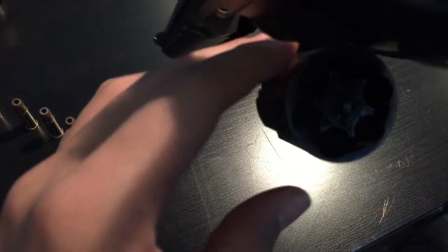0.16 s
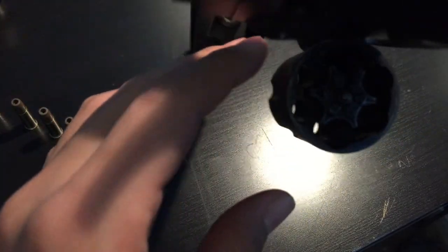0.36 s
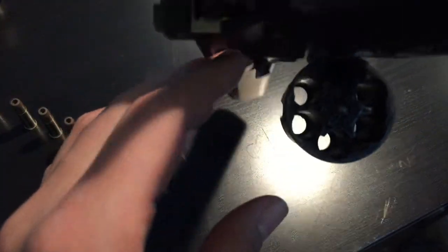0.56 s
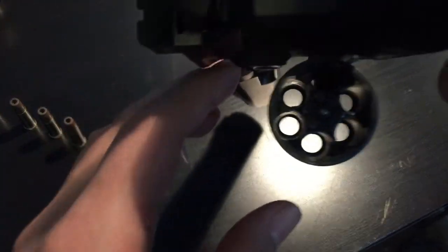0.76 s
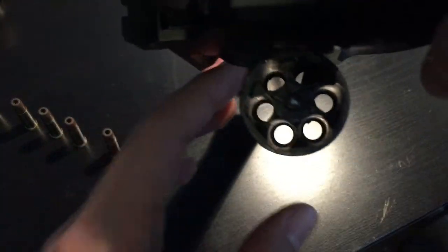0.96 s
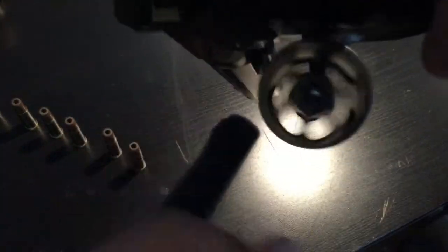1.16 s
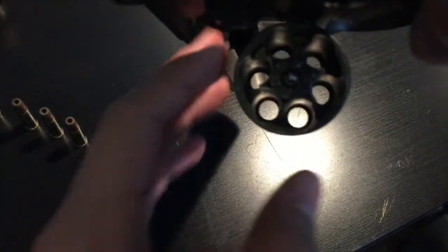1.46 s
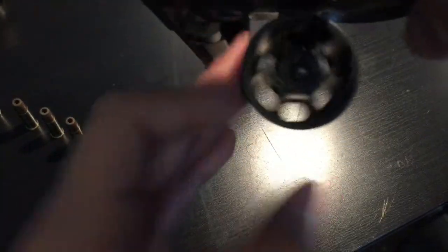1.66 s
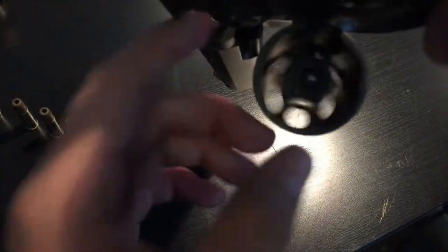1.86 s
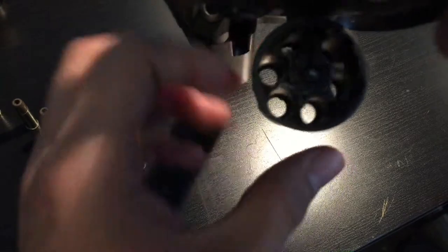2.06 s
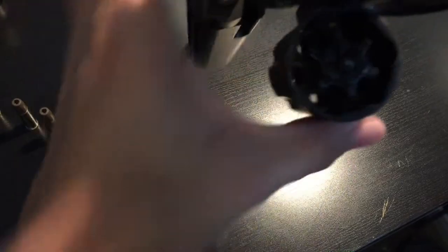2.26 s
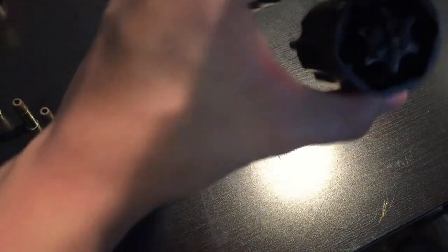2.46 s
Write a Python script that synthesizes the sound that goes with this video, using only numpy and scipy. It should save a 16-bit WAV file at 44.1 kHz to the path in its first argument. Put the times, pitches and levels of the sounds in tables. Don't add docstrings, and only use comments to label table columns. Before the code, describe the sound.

A toy revolver clicks close to a phone microphone: faint ticks and a soft flick, a hard latch snap, a duller finger catch, light ticks, then a loud metallic snap shut in a small room.

```python
import sys
import numpy as np
from scipy import signal
from scipy.io import wavfile
from scipy.ndimage import uniform_filter1d

SR = 44100
rng = np.random.default_rng(int(sys.argv[2]) if len(sys.argv) > 2 else 0)


def elevation(decibels):
    levels = np.asarray(decibels, float)
    return 10 ** (levels / 20)


def wav_record(signal):
    frames = np.transpose(np.atleast_2d(signal))
    bounded = np.clip(frames, -1, 1)
    quanta = np.round(bounded * 32767).astype(np.int16)
    wavfile.write(sys.argv[1], SR, quanta)


N = 114660

# pitch_hz, level_db (per Hz)
HISS_SPECTRUM = [(25, -25.5), (60, -5), (130, -5.5), (300, -11), (600, -15.5), (2000, -20), (8000, -28),
                 (15000, -28.5)]
# pitch_hz, width_hz, level_db (rms)
FAN_BANDS = [(61.24, 20, -73.5), (131, 19, -77), (293.7, 60, -77), (942, 22, -85)]
# pitch_hz, level_db, t60_s
ROOM_BANDS = [(300, -35, 0.3), (700, -36, 0.3), (1400, -30, 0.3), (2800, -18.5, 0.19), (5000, -23, 0.27),
              (8000, -25, 0.33), (11000, -30.5, .25)]
# start_s, level_db
ROOM_SEND = [
    (0, -6),
    (1.0, 2),
    (1.5, 1),
    (1.9, -7),
    (2.5, 1),
]
# start_s, level_db (peak), pitch_hz, t60_s
TABLE_THUMPS = [(.470, -59, 66, 0.25), (.8425, -42.5, 251, 0.044), (.8434, -28, 620, 0.022),
                (.855, -48, 330, .03), (.845, -45.5, 91, 0.075), (1.1481, -36, 400, 0.049),
                (1.147, -30, 280, 0.029), (1.149, -32, 150, .07), (1.158, -32.5, 65, 0.11),
                (1.646, -43.5, 236, .04), (1.654, -37.5, 112.6, 0.045), (1.659, -50.5, 55, .2),
                (2.007, -47.5, 160, 0.048), (2.071, -64, 62, 0.34), (2.390, -60.5, 62, 0.39),
                (2.584, -45, 140, 0.11), (2.586, -48, 380, 0.05)]
# start_s, level_db (peak), pitch_hz (final), t60_s
FINGER_SKIDS = [
    (.858, -49, 800, .14),
    (.864, -63, 1450, .06),
]
# pitch_hz, level_db, t60_s
FRAME_MODES = [(781, 8, .03), (1050, 0, .05), (1420, 3, 0.04), (2000, -0.5, 0.021), (2700, 5, 0.033),
               (2990, -3, .03), (4423, -5.5, 0.047), (5720, -3.5, 0.0088), (6650, -4.5, 0.06),
               (7906, -7, 0.06), (9240, 3.5, 0.025), (12000, -2, 0.054), (12790, -16.5, 0.035),
               (13720, -9.5, 0.035)]
# pitch_hz, level_db, t60_s
CYLINDER_MODES = [(11788, 0, .065), (11835, -11, .12), (11765, -18, .22), (14880, -30, .24),
                  (14770, -33, .26), (14990, -31, .13)]
# pitch_hz, level_db, t60_s
BARREL_MODES = [(780, -33, .3), (935, -33, .42), (990, -29, .4), (1050, -30, .36), (1375, -34, .42),
                (1425, -34, .4)]
# start_s, level_db (peak), pitch_hz (centre), t60_s
LOOSE_TICKS = [(.7540, -49, 1850, 0.018), (0.7541, -48, 2960, 0.019), (.7545, -49.5, 7240, 0.019),
               (1.845, -56, 2540, 0.018), (1.86, -54, 890, 0.042), (1.888, -60, 1400, 0.018),
               (1.917, -59, 2500, 0.011), (2.139, -47, 2510, 0.019), (2.1394, -53, 1280, .016),
               (2.274, -41.5, 1505, 0.022), (2.2745, -43, 2610, 0.013), (2.2748, -46, 4860, 0.0098),
               (2.327, -51.5, 2570, 0.017), (2.3272, -57, 1330, 0.021), (2.4, -67.5, 12000, .04),
               (2.2746, -54, 6600, .015), (2.2747, -56, 12500, .012), (1.858, -60, 1600, .04)]
# start_s, level_db (peak), pitch_hz (centre), t60_s, ring_db
FINGER_CONTACTS = [(.833, -58, 1700, 0.092, -36), (.8436, -36, 660, 0.02, -36),
                   (.843, -56, 5200, 0.009, -48), (.8436, -37, 1270, .026, -48),
                   (.8415, -47, 1900, 0.018, -52), (.843, -54, 2700, .014, -52),
                   (.856, -51.5, 625, 0.08, -48), (1.613, -56, 913, 0.15, -46),
                   (1.6436, -21.5, 4540, .014, -45), (1.6445, -28, 2200, 0.035, -37),
                   (1.6485, -27, 1900, 0.012, -35), (1.6505, -41, 7800, 0.015, -17),
                   (1.649, -26, 1150, 0.022, -40), (1.6545, -31, 930, .014, -40),
                   (1.651, -33, 2900, .02, -40), (1.648, -33, 4400, .02, -40),
                   (1.662, -53, 3460, 0.083, -40), (1.672, -44, 2200, 0.06, -38),
                   (1.68, -54, 3900, 0.15, -37), (1.7015, -51, 2430, .025, -40), (1.72, -60, 2400, .2, -40),
                   (1.735, -58.5, 14500, 0.057, -8), (1.81, -61, 13000, 0.045, -21),
                   (1.9978, -39.5, 4550, 0.02, -52), (1.9982, -32, 2500, 0.015, -47),
                   (2.0075, -48, 5800, 0.0046, -42.5), (2.0084, -32, 1220, 0.022, -53),
                   (2.0126, -38, 2300, 0.015, -47), (2.018, -52, 1800, .12, -50),
                   (2.0, -40, 1100, 0.025, -40)]
# start_s, level_db (peak), pitch_hz (centre), t60_s, ring_db
LATCH_SNAPS = [(1.1476, -7.5, 4800, .012, -25.5), (1.1486, -13, 1418, .03, -29),
               (1.1503, -19, 1045, 0.022, -26), (1.1513, -14.5, 6392, .015, -3),
               (1.153, -20, 2750, .015, -11.5), (1.1678, -22, 1300, .02, -27),
               (1.1701, -13, 7500, .004, -16), (1.1715, -24, 7000, .012, -31),
               (1.1735, -25, 2700, .015, -31), (1.177, -30, 1300, .02, -30),
               (1.184, -33, 1400, .015, -28.5), (1.189, -39, 1301, .012, -25.5),
               (2.5608, -56, 5700, .01, -15), (2.5635, -52, 2590, 0.03, -5.5),
               (2.578, -45, 3000, 0.04, -30), (2.5775, -48, 900, .015, -30), (2.5834, -6, 5600, 0.027, -21),
               (2.5852, -8, 8000, 0.014, -19), (2.5838, -8, 13700, 0.024, -22),
               (2.5857, -10, 2830, 0.0115, -18), (2.5864, -2, 2330, 0.011, -22.5),
               (2.5882, -13, 5600, 0.03, 6.5), (2.5892, -14, 1000, 0.045, -23),
               (2.5925, -19, 1270, 0.03, -8), (2.591, -19, 7700, .03, -12), (2.597, -25, 2600, .03, -20)]


def band(x, hz, width_hz):
    hz = min(hz, .45 * SR)
    b, a = signal.iirpeak(hz, hz / min(width_hz, .35 * SR), fs=SR)
    return signal.lfilter(b, a, x)


def wide_band(x, hz, first_hz, second_hz):
    return band(band(x, hz, first_hz), hz, second_hz)


def low_cut(x, order, hz):
    return signal.sosfilt(signal.butter(order, hz, "high", fs=SR, output="sos"), x)


def unit(x):
    return x / np.sqrt(np.mean(x ** 2))


def peak(x):
    return x / np.abs(x).max()


def fade(t, t60):
    return np.exp(-np.log(1000) * t / max(t60, .002))


def walk(rate_hz):
    hold = int(SR / rate_hz)
    steps = np.repeat(rng.standard_normal(N // hold + 1), hold)
    return 1.6 * uniform_filter1d(uniform_filter1d(steps, hold), hold)[:N]


def add(out, start_s, x):
    i = int(start_s * SR)
    out[i:i + len(x)] += x[:N - i]


def hiss():
    out = np.zeros(N)
    hz_points, db_points = np.array(HISS_SPECTRUM).T
    for hz in 30 * 2 ** np.arange(0, 9.1, .5):
        per_hz_db = np.interp(np.log(hz), np.log(hz_points), db_points)
        level_db = per_hz_db + 10 * np.log10(hz) + .6 * walk(6.5)
        out += elevation(level_db) * unit(wide_band(rng.standard_normal(N), hz, hz / 2, hz / 2))
    return elevation(-68.5) * unit(out)


def fan():
    swell = elevation(3.0 * walk(3.1))
    rumble, *upper = [elevation(db) * unit(band(rng.standard_normal(N), hz, width_hz)) for hz, width_hz, db in FAN_BANDS]
    motor_level = elevation(-72 + 2.2 * walk(14))
    motor_hz = 293.7 + 2.5 * walk(9.88)
    motor = motor_level * np.sin(2 * np.pi * np.cumsum(motor_hz) / SR)
    return swell * rumble + sum(upper) + motor


def room(x):
    rise_s, top_hz = 0.0092, 12000
    t = np.arange(SR // 2) / SR
    tail = np.zeros(len(t))
    for hz, db, t60 in ROOM_BANDS:
        noise = wide_band(rng.standard_normal(len(t)), hz, 0.93 * hz, 1.5 * hz)
        tail += elevation(db) * fade(t, t60) * unit(noise)
    tail = signal.sosfilt(signal.butter(8, top_hz, fs=SR, output="sos"), tail)
    build_up = (t / rise_s).clip(0, 1) ** 2
    return signal.fftconvolve(x, tail * build_up * elevation(-26.0))[:N]


def room_send():
    starts, level_db = np.array(ROOM_SEND).T
    current = np.searchsorted(starts, np.arange(N) / SR, side="right") - 1
    return elevation(level_db[current])


def gliding_tones(table, sag):
    rise_s = 0.0014
    out, t = np.zeros(N), np.arange(SR // 3) / SR
    for start_s, db, hz, t60 in table:
        phase = 2 * np.pi * np.cumsum(hz * (1 + sag * fade(t, t60))) / SR
        onset = 1 - np.exp(-t * hz / 100 / rise_s)
        add(out, start_s, elevation(db) * fade(t, t60) * onset * np.sin(phase))
    return out


def table_thumps():
    return gliding_tones(TABLE_THUMPS, .3)


def finger_skids():
    return gliding_tones(FINGER_SKIDS, -.3)


def modes(t, table, gains_db, phases):
    out = np.zeros(len(t))
    for (hz, db, t60), gain_db, phase in zip(table, gains_db, phases):
        out += elevation(db + gain_db) * fade(t, t60) * np.sin(2 * np.pi * (hz * t + phase))
    return out


def nearness_db(table, hz):
    reach_oct = 0.47
    return np.array([-6.0 * min((np.log2(mode[0] / hz) / reach_oct) ** 2, 5.0) for mode in table])


def crack(t, burst, shape, hz, t60, width):
    coloured = elevation(-2.5) * peak(wide_band(burst, hz, width * hz, 2 * width * hz))
    knock = elevation(-3) * shape * fade(t, t60) * np.sin(2 * np.pi * hz * t)
    tick = elevation(-21) * min(hz / 4000, 1) * burst * fade(t, t60)
    return coloured + knock + tick


def frame(t, hz, t60, chance):
    held = [(f * (1 + .02 * shift), db, d60) for (f, db, d60), shift in zip(FRAME_MODES, chance[40:])]
    gains_db = -11 + nearness_db(FRAME_MODES, hz) + 2.7 * chance[:14]
    return modes(t, held, gains_db, np.zeros(14)) * fade(t, 3.0 * t60)


def metal(t, hz, ring_db, barrel_db, chance):
    cylinder = modes(t, CYLINDER_MODES, ring_db + 2 * chance[14:20], chance[20:])
    barrel = modes(t, BARREL_MODES, barrel_db + nearness_db(BARREL_MODES, hz), chance[30:])
    return (1 - np.exp(-t / .0002)) * (cylinder + barrel)


def contacts(table, barrel_db, width):
    direct, scattered = np.zeros(N), np.zeros(N)
    t = np.arange(SR // 2) / SR
    short = t[:4096]
    for start_s, db, hz, t60, ring_db in table:
        chance = rng.standard_normal(64)
        shape = fade(short, t60) * (1 - np.exp(-short / .0002))
        burst = rng.standard_normal(len(short)) * shape
        hit = crack(short, burst, shape, hz, t60, width) + frame(short, hz, t60, chance)
        add(direct, start_s, elevation(db) * hit)
        add(direct, start_s, elevation(db) * metal(t, hz, ring_db, barrel_db, chance))
        spray = wide_band(burst * fade(short, t60), hz, 2.2 * hz, 3.5 * hz)
        add(scattered, start_s, elevation(db - 1) * peak(spray))
    return low_cut([direct, scattered], 4, 420)


def loose_ticks():
    silent_db = -80
    return contacts([(*row, silent_db) for row in LOOSE_TICKS], silent_db, 0.16)


def finger_contacts():
    return contacts(FINGER_CONTACTS, -17.0, .45)


def latch_snaps():
    return contacts(LATCH_SNAPS, 0.96, .7)


def scene():
    bed = hiss() + fan()
    gun, scattered = latch_snaps() + finger_contacts() + loose_ticks()
    reflections = room(room_send() * scattered)
    return (bed + reflections + table_thumps() + finger_skids() + gun)[None]


def roll_off(x):
    return signal.sosfilt(signal.butter(12, 16170, fs=SR, output="sos"), x)


def record(dry):
    ceiling = 1.1
    x = dry - .7 * band(dry, 10500, 550)
    x = low_cut(x, 2, 36)
    x = ceiling * np.tanh(x / ceiling)
    x = signal.sosfilt(signal.cheby1(8, .5, 15250, fs=SR, output="sos"), x)
    return roll_off(x)


dry = scene()
out = record(dry)
wav_record(out)
```